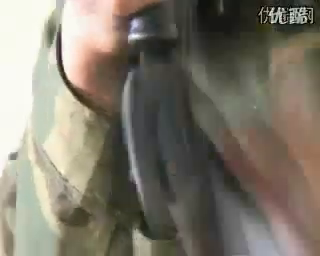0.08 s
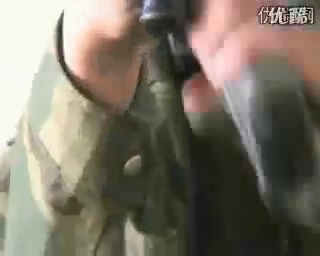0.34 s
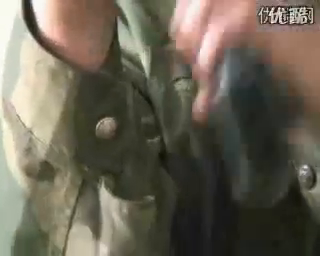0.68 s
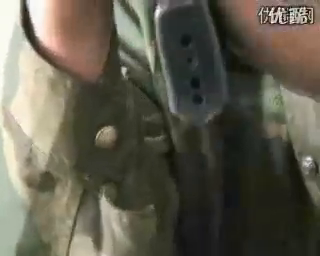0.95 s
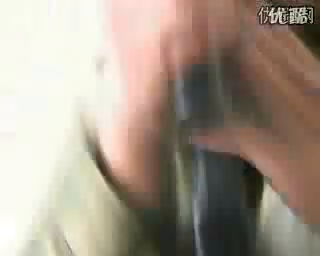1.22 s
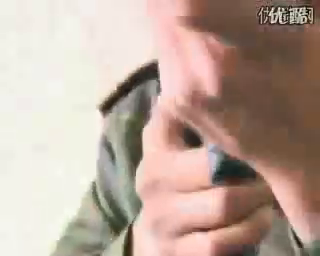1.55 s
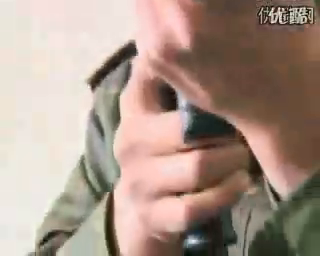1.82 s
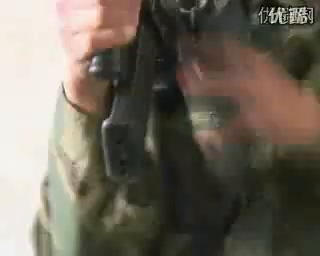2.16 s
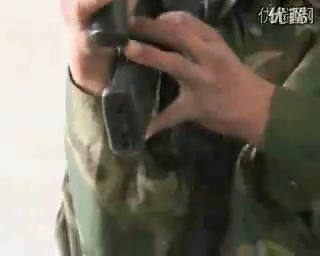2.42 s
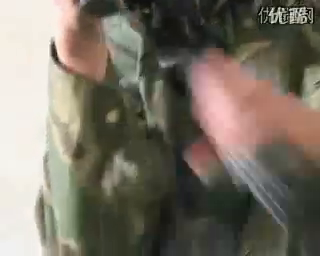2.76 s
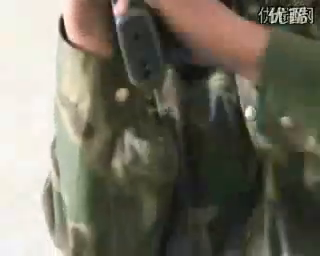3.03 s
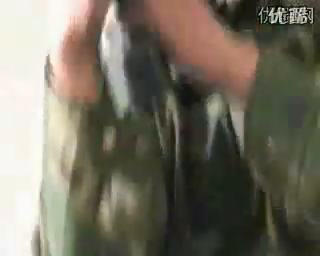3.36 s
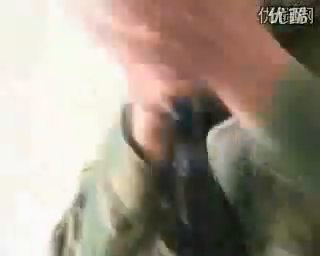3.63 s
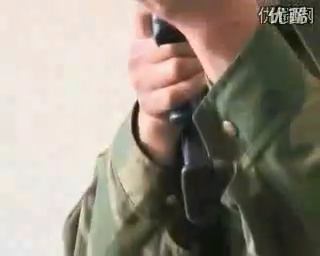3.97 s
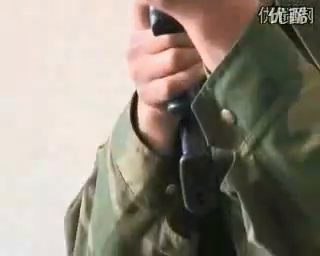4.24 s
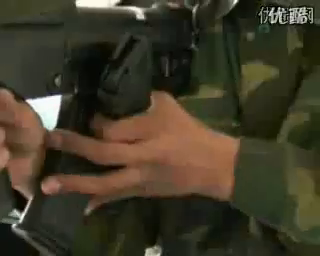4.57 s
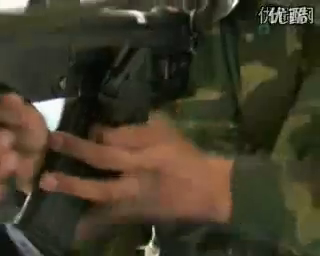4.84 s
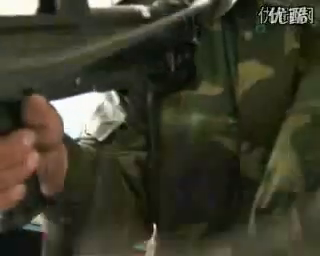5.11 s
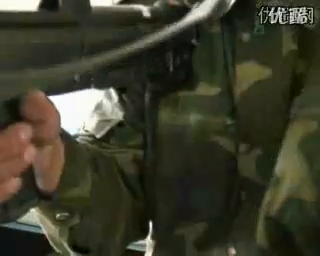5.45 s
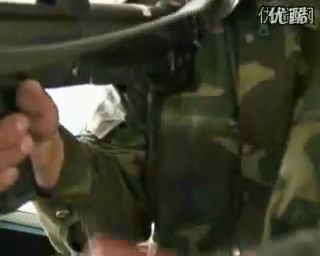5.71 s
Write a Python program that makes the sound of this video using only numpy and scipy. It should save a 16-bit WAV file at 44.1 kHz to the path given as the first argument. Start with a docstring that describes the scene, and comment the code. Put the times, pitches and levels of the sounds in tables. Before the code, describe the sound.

A rifle magazine is pulled out and seated repeatedly, with sharp metal clicks, ringing clacks and faint sleeve rustle in a bare room.

```python
"""A rifle's magazine is unlatched, pulled out and rocked back in several times in a bare, echoing room.
Sleeves rustle and steel clicks faintly over still air. From 1 s come the hard contacts: each chatters,
knocks the hollow magazine and leaves the steel ringing. A soft, close knock falls in a lull at 2.9 s.
At 4 s the magazine is driven home and the stock booms; the clacks go on until 5.2 s.
At the end something bumps, taps and scrapes right beside the microphone."""
import sys
import numpy as np
from scipy import signal
from scipy.fft import rfft, irfft
from scipy.io import wavfile

SR = 44100
rng = np.random.default_rng(int(sys.argv[2]) if len(sys.argv) > 2 else 0)


def wav_out(sig):
    """Save sig, one row per channel (or a flat mono array), as 16-bit PCM at SR to the path in sys.argv[1]."""
    wavfile.write(sys.argv[1], SR, np.round(np.clip(np.atleast_2d(sig).T, -1, 1) * 32767).astype(np.int16))


N = 264159
TIME = np.arange(N) / SR

# metal contacts: (time [s], level [dB], brightness [dB], chatter decay [ms], pitch [Hz], touch lead [ms])
CONTACTS = [ (0.002, -50.5, 12, 5.7, 1010, 0.5), (0.495, -55.5, 15, 130, 1200, 3.5),
            (0.705, -39.5, -20, 2, 680, -0.5), (0.732, -35.5, -2.5, 5.3, 1165, 0.5),
            (0.857, -51, -8.5, 3.9, 816, -0.5), (0.968, -47, -21, 3.1, 770, 1.5),
            (1.030, -11.5, -3.5, 4.2, 1105, 10), (1.059, -21.5, 2, 7.3, 1130, 0),
            (1.330, -44, -5.5, 10, 1520, -2.5), (1.427, -25, -5.5, 5.1, 690, -0.5),
            (1.458, -12.5, -0.5, 2.7, 1000, 1), (1.472, -13, 6.5, 8.4, 1070, -0.5),
            (1.565, -22.5, 3, 7.4, 1473, 0), (1.689, -26.5, 4, 18, 1300, 0.5),
            (1.755, -11, 7, 2.7, 1540, 1), (1.767, -14, 0.5, 6, 1300, 0),
            (1.787, -14.5, -16.5, 6.2, 833, 1), (1.814, -19.5, -15.5, 2.1, 1080, 2),
            (1.941, -15, -4.5, 0.83, 766, 0), (1.996, -8, 3.5, 15, 1556, 11),
            (2.088, -17.5, -4.5, 13, 947, 0), (2.128, -21.5, -4, 16, 960, -1),
            (2.415, -41, -4, 5.2, 1050, 3), (2.475, -35.5, -0.5, 2.7, 1355, 0),
            (2.965, -54, 2, 0.94, 1400, -3.5), (3.094, -50, -2.5, 2.6, 700, 1),
            (3.227, -28.5, -6.5, 7.1, 1120, -0.5), (3.417, -41.5, -23, 1, 895, -0.5),
            (3.510, -15, -4.5, 3.5, 1305, 15), (3.537, -11.5, -2.5, 2.2, 1030, -0.5),
            (3.854, -26.5, -1.5, 3.3, 1335, -0.5), (3.918, -26.5, -1.5, 75, 1130, -1.5),
            (3.964, -14, 1.5, 7.8, 1040, 0.5), (3.994, -6.5, 3.5, 8, 980, 9),
            (4.193, -12, -0.5, 6.3, 1380, 16), (4.227, -15, -5, 6.1, 1400, 0.5),
            (4.250, -11, -8, 2.4, 1334, -0.5), (4.321, -14, 7.5, 3.1, 1800, 0.5),
            (4.411, -9.5, -3, 3.1, 910, 10.5), (4.518, -26, -6.5, 9.3, 1470, 1),
            (4.621, -27.5, 1, 7.1, 1750, 13.5), (4.650, -35.5, 1, 65, 1380, -2),
            (4.897, -17, -2.5, 3.8, 915, 8.5), (5.056, -17, -1.5, 1.7, 886, 10.5),
            (5.125, -29.5, -22, 11, 650, 0.5), (5.191, -36, -30, 6, 880, -1)]
# ringing steel: (frequency [Hz], level [dB])
STEEL_MODES = [(590, -17.5), (942, -4.5), (975, -11.5), (1431, -6), (1735, -11.5), (1900, -11.5),
               (2303, -8), (2466, -9.5), (2555, -15.5), (3050, -19), (3409, -11), (4600, -12), (4890, -9.5),
               (5520, -11.5), (6430, -18)]
TOUCH_DB, TOUCH_BRIGHT_DB, TOUCH_CHATTER_MS = -7, -2, 4.9
SETTLE_DELAY_S, SETTLE_DB, SETTLE_BRIGHT_DB, SETTLE_CHATTER_MS = 0.013, -14.5, 2, 10
DIRECT_DB, ROOM_DB, RING_DB = 0.4, -0.04, -7.5
# bright, hard contacts ring, rattle and carry more than hand-cushioned ones [dB per dB]
RING_PER_BRIGHT, SETTLE_PER_BRIGHT, ROOM_PER_BRIGHT = 0.28, 0.18, 0.16


def rifle(snap_room_db=3, slide_db=-18, slide_ms=7, ring_t60_s=0.41, echo_patterns=4):
    """Parts slide, touch edge first, strike and rattle to rest; the steel rings, the room answers."""
    # the grip damps modes either side of 1 kHz
    steel = [(hz, db, ring_t60_s * np.sqrt(min(hz / 1000, 1000 / hz))) for hz, db in STEEL_MODES]
    approach = np.exp(-1000 * TIME[:2000] / slide_ms)[::-1]
    direct, sends = np.zeros(N), np.zeros((echo_patterns, N))
    for k, (s, db, bright_db, chatter_ms, pitch_hz, lead_ms) in enumerate(CONTACTS):
        touch = contact(db + TOUCH_DB, bright_db + TOUCH_BRIGHT_DB, TOUCH_CHATTER_MS, pitch_hz)
        blow = contact(db, bright_db, chatter_ms, pitch_hz)
        settle_db = db + SETTLE_DB + SETTLE_PER_BRIGHT * bright_db
        settle = contact(settle_db, bright_db + SETTLE_BRIGHT_DB, SETTLE_CHATTER_MS, pitch_hz)
        carry = undb(ROOM_DB + ROOM_PER_BRIGHT * bright_db)
        send = sends[k % echo_patterns]  # the rifle moves, so the echoes vary
        stages = [(s - lead_ms / 1000, touch), (s, blow), (s + SETTLE_DELAY_S, settle)]
        for start_s, (knock, snap) in stages:
            add(direct, start_s, knock + snap)
            add(send, start_s, carry * (knock + undb(snap_room_db) * snap))
        ring_db = db + RING_DB + RING_PER_BRIGHT * bright_db
        add(direct, s, undb(ring_db) * unit(ringing(steel, size=22000)))
        slide = steady(colour(grains(len(approach), spread_db=-0.5), SNAP_SPECTRUM)) * approach
        add(direct, s - len(slide) / SR, undb(db + slide_db) * slide)
    return undb(DIRECT_DB) * close(direct) + sum(room(send) for send in sends)


# steel-on-steel snap: (frequency [Hz], level [dB])
SNAP_SPECTRUM = [(200, -38), (450, -30), (900, -36), (2000, 8.5), (3000, 8), (4200, 8.5), (5400, 7.5),
                 (6600, 8), (7800, -0.5)]


def contact(db, bright_db, chatter_ms, pitch_hz, snap_linger_ms=0.9, uneven_db=2):
    """Hollow knock and bright snap of one contact; brightness splits the energy between them."""
    gain = undb(db) / np.hypot(1, undb(bright_db))
    knock = unit(magazine(chatter(chatter_ms, bite_ms=0.5), pitch_hz))
    spectrum = [(hz, level_db + uneven_db * rng.standard_normal()) for hz, level_db in SNAP_SPECTRUM]
    snap = unit(colour(chatter(chatter_ms + snap_linger_ms, bite_ms=1.0), spectrum))
    return gain * knock, gain * undb(bright_db) * snap


# hollow magazine and receiver: (frequency [Hz], width [Hz], level [dB])
MAGAZINE_MODES = [(641.4, 184, -1), (847, 171, 4), (910.5, 120, 3), (1270, 300, -1.5), (1447, 169, 0.5),
                  (1914, 570, -12)]


def magazine(force, pitch_hz, pitch_db=-3, pitch_width_hz=130):
    """Broad resonances of the hollow body, plus the one the contact point favours."""
    body = sum((-1) ** k * undb(db) * resonance(force, hz, width_hz)
               for k, (hz, width_hz, db) in enumerate(MAGAZINE_MODES))
    favoured = resonance(force, pitch_hz, pitch_width_hz)
    knock = unit(body) + undb(pitch_db) * unit(favoured)
    return highpass(knock, hz=520, order=5)


# jolts of the rifle's weight, and last a long low rumble of an arm moving close by: (time [s], level [dB],
# decay [ms])
JOLTS = [(1.034, -46, 42), (1.454, -24.5, 47), (1.570, -44, 78), (1.695, -51, 34), (1.752, -39, 11),
         (3.961, -31, 14), (3.991, -30, 5), (4.319, -27, 4.6), (4.969, -45, 14), (5.056, -41, 11),
         (5.269, -61, 310)]
# thud of a jolt: (frequency [Hz], level [dB])
THUD_SPECTRUM = [(25, -23.5), (60, -7.5), (120, -5), (190, 0), (320, -3), (500, -8), (1000, -40.5)]
# booming stock: (frequency [Hz], level [dB], t60 [s])
STOCK_MODES = [(135, -5, 0.056), (190.7, 1.5, 0.06)]


def jolts(boom_s=3.991, boom_db=-16.5):
    """Shoves jolt the rifle in the hands with low thuds, and a moving arm rumbles low; driving the magazine
    home booms the stock."""
    track, t = np.zeros(N), TIME[:12000]
    for s, db, decay_ms in JOLTS:
        fade = np.exp(-1000 * t / decay_ms)
        thud = colour(rng.standard_normal(len(t)) * fade, THUD_SPECTRUM)
        add(track, s, undb(db) * thud * np.linalg.norm(fade) / np.linalg.norm(thud))
    add(track, boom_s, undb(boom_db) * unit(ringing(STOCK_MODES, size=8000)))
    return close(track)


# dull bumps: (time [s], level [dB])
BUMP_HITS = [(5.398, -46.5), (5.525, -46.5), (5.793, -40.5), (5.823, -21.5), (5.845, -9.5), (5.884, -21),
             (5.898, -10.5), (5.938, -9), (5.948, -17.5), (5.976, -26)]
# bumped object: (frequency [Hz], level [dB], t60 [s])
BUMP_MODES = [(309, -7.5, 0.17), (349, 9, 0.023), (445, 5.5, 0.095), (528, 10, 0.021), (741, 5, 0.087),
              (1300, 4.5, 0.017)]


def bumps(scuff_db=-6):
    """Dull bumps with a scuff on each, too close for the room to be heard."""
    track = np.zeros(N)
    for s, db in BUMP_HITS:
        add(track, s, undb(db) * unit(ringing(BUMP_MODES, size=5000)))
        scuff = colour(chatter(decay_ms=13.4, bite_ms=0.2), SCRAPE_SPECTRUM)
        add(track, s, undb(db + scuff_db) * unit(scuff))
    return close(track)


# close friction: (frequency [Hz], level [dB])
SCRAPE_SPECTRUM = [(40, -34), (150, -27.5), (270, 3), (750, 1), (1500, -1), (2500, -6.5), (4000, -7.5),
                   (5200, -10.5), (6000, -20), (7500, -55)]


def scrape(peak_s=5.912, peak_db=-13, rise_db_per_s=319, fall_db_per_s=116):
    """A close, gritty push that builds quickly and eases off."""
    after_s = TIME - peak_s
    db = peak_db + np.minimum(rise_db_per_s * after_s, -fall_db_per_s * after_s)
    return rubbing(undb(db), SCRAPE_SPECTRUM, grit_db=1.0)


# tapped object: (frequency [Hz], level [dB], t60 [s])
TAP_MODES = [(806, -3, 0.035), (933, -4.5, 0.027), (1240, -10.5, 0.038), (1730, -19.5, 0.019),
             (2250, -12, 0.028), (3140, -15.5, 0.028), (4670, -19, 0.012), (6300, -37, 0.0119)]


def tap(time_s=5.6853, db=-20.5, tick_db=-10):
    """One close, dry tap: short-lived modes and a bright tick, wide in stereo."""
    mid, side = np.zeros((2, N))
    for track in (mid, side):
        add(track, time_s, undb(db) * unit(ringing(TAP_MODES, size=4000)))
        tick = colour(chatter(decay_ms=3.7, bite_ms=0.2), SNAP_SPECTRUM)
        add(track, time_s, undb(db + tick_db) * unit(tick))
    return np.array([mid + side, mid - side])


# knocked object: (frequency [Hz], level [dB], t60 [s])
KNOCK_MODES = [(282, 0.5, 0.046), (1344, -17.5, 0.028), (1710, -6.5, 0.025), (1890, -15, 0.012),
               (2430, -10, 0.02)]


def soft_knock(time_s=2.860, db=-41):
    """One small, close knock on well-damped modes."""
    track = np.zeros(N)
    add(track, time_s, undb(db) * unit(ringing(KNOCK_MODES, size=4000)))
    return close(track)


# arm movements: (peak time [s], level [dB], swell and fade [s])
ARM_STROKES = [(0.0, -55, 0.086), (0.66, -53.5, .14), (1.3, -57.5, 0.34), (2.48, -58, 0.21),
               (3.14, -65, 0.091), (3.549, -55, 0.46), (4.82, -60, 0.17), (5.41, -60.5, 0.21),
               (5.72, -55, 0.071)]
# rustling cloth: (frequency [Hz], level [dB])
CLOTH_SPECTRUM = [(25, -15), (70, -6.5), (200, -5), (400, 4.5), (700, 0), (1400, 0.5), (2500, -3),
                  (5000, -7), (7800, -20.5)]


def sleeves():
    """Cloth brushes as each arm movement speeds up and slows down."""
    speed = sum(undb(db) / np.cosh(2 * (TIME - s) / swell_s) for s, db, swell_s in ARM_STROKES)
    return rubbing(speed, CLOTH_SPECTRUM, grit_db=0)


# width of direct sound: (frequency [Hz], side over mid [dB])
DIRECT_WIDTH = [(200, -5), (1200, -10), (2500, -6.5), (4000, -2), (7500, -3)]


def close(x):
    """Direct sound, scattered differently into each channel by nearby surfaces."""
    scatter = rng.standard_normal(128) * np.hanning(128)
    side = signal.fftconvolve(x, scatter / np.linalg.norm(scatter))[:N]
    return stereo(x, side, DIRECT_WIDTH)


# reverberation: (frequency [Hz], t60 [s])
ROOM_DECAY = [(200, 0.36), (600, 0.37), (1400, 0.36), (3500, 0.36), (7500, 0.3)]
# width of echoes and friction: (frequency [Hz], side over mid [dB])
DIFFUSE_WIDTH = [(200, -18), (700, -6), (1400, -10.5), (2500, -5.5), (4000, 0), (7500, -2.5)]


def room(x, build_s=0.0041):
    """Dense echoes off bare walls build quickly and die sooner in the treble."""
    t = TIME[:32768]
    hz = np.fft.rfftfreq(len(t), 1 / SR)
    centres_hz, t60s = np.transpose(ROOM_DECAY)
    onset = 1 - np.exp(-(t / build_s) ** 2)
    mid_side = []
    for _ in range(2):
        noise = rfft(rng.standard_normal(len(t)))
        bands = [irfft(noise * along(np.c_[centres_hz, share], hz)) for share in np.eye(len(t60s))]
        tail = onset * sum(band * np.exp(-np.log(1000) * t / t60) for band, t60 in zip(bands, t60s))
        mid_side.append(signal.fftconvolve(x, tail / np.linalg.norm(tail))[:N])
    return stereo(*mid_side, DIFFUSE_WIDTH)


# still room air: (frequency [Hz], relative level [dB])
AIR_SPECTRUM = [(15, -38.5), (25, -4.5), (87, -1.5), (113, -8), (162, -2.5), (226, -8.5), (287, -6),
                (822, -14), (2720, -16.5), (5440, -22), (7600, -22.5), (9880, -42.5), (16700, -120)]


def air(mid_db=-66.5, side_db=-3):
    """Faint steady hiss and rumble."""
    mid, side = (steady(colour(rng.standard_normal(N), AIR_SPECTRUM)) for _ in range(2))
    side *= undb(side_db)
    return undb(mid_db) * np.array([mid + side, mid - side])


def grains(size, spread_db):
    """Dense micro-contacts of uneven strength."""
    strength = np.repeat(rng.standard_normal(size // 32 + 1), 32)[:size]
    return rng.standard_normal(size) * undb(spread_db * strength)


def chatter(decay_ms, bite_ms):
    """Surfaces bite, then tiny rebounds die away."""
    ms = 1000 * TIME[:6000]
    return grains(len(ms), spread_db=2.5) * np.exp(-ms / decay_ms) * (1 - np.exp(-ms / bite_ms))


def rubbing(speed, spectrum, grit_db):
    """Friction: countless tiny catches, as loud as the movement is fast."""
    mid, side = (speed * steady(colour(grains(N, grit_db), spectrum)) for _ in range(2))
    return stereo(mid, side, DIFFUSE_WIDTH)


def ringing(modes, size, uneven_db=2, detune=0.004):
    """Damped modes; the strike point shifts their balance, the grip their tuning."""
    t = TIME[:size]
    hz, db, t60 = np.transpose(modes)[:, :, None]
    gain = undb(db + uneven_db * rng.standard_normal(hz.shape)) * rng.choice([-1, 1], hz.shape)
    hz = hz * (1 + detune * rng.standard_normal(hz.shape))
    partials = gain * np.exp(-np.log(1000) * t / t60) * np.sin(2 * np.pi * hz * t)
    return highpass(partials.sum(axis=0), hz=0.7 * hz.min(), order=4)  # little radiates below the modes


def resonance(x, hz, width_hz):
    """Two-pole band-pass, gain 1 at the centre."""
    return signal.lfilter(*signal.iirpeak(hz, hz / width_hz, SR), x)


def highpass(x, hz, order):
    """Maximally flat high-pass."""
    return signal.sosfilt(signal.butter(order, hz, "high", fs=SR, output="sos"), x)


def colour(x, spectrum, size=2048):
    """Minimum-phase filter through (frequency [Hz], level [dB]) points."""
    gain = undb(along(spectrum, np.fft.rfftfreq(size, 1 / SR)))
    cepstrum = irfft(np.log(gain))
    cepstrum[1:size // 2] *= 2
    cepstrum[size // 2 + 1:] = 0
    impulse = irfft(np.exp(rfft(cepstrum)))
    return signal.fftconvolve(x, impulse)[:len(x)]


def along(points, hz):
    """Interpolate (frequency [Hz], value) points on a log-frequency axis."""
    points_hz, values = np.transpose(points)
    return np.interp(np.log(hz + 1), np.log(points_hz), values)


def stereo(mid, side, width):
    """Left and right from mid and width-filtered side."""
    side = colour(side, width)
    return np.array([mid + side, mid - side])


def add(track, s, sound):
    """Mix a sound into a track at time s."""
    start = max(int(s * SR), 0)
    part = sound[:max(N - start, 0)]
    track[start:start + len(part)] += part


def undb(db):
    """Decibels to gain."""
    return 10 ** (np.asarray(db) / 20)


def unit(x):
    """Scale to the energy of 4 ms at full level."""
    return x * np.sqrt(0.004 * SR / np.sum(x ** 2))


def steady(x):
    """Scale to rms 1."""
    return x / np.sqrt(np.mean(x ** 2))


def scene():
    """Rifle, close handling, sleeves and room air."""
    return rifle() + jolts() + bumps() + scrape() + tap() + soft_knock() + sleeves() + air()


def record(dry, top_hz=7730):
    """Round the loudest peaks, then cut the treble steeply."""
    rounded = np.tanh(dry)
    return signal.sosfilt(signal.ellip(10, 0.2, 75, top_hz, fs=SR, output="sos"), rounded)


dry = scene()
out = record(dry)
wav_out(out)
```